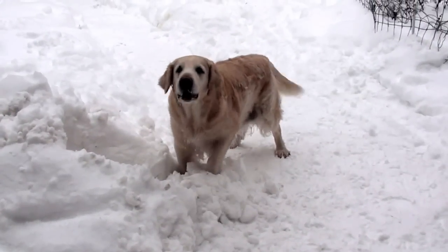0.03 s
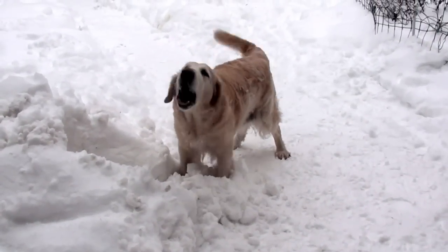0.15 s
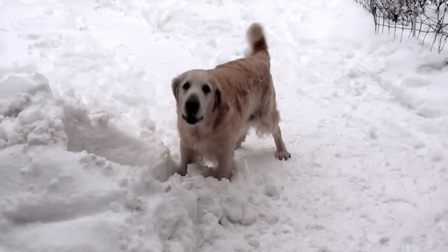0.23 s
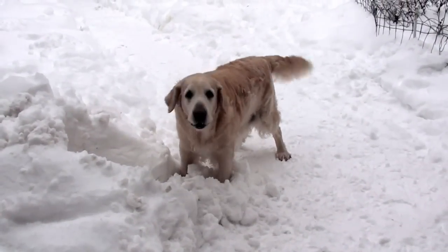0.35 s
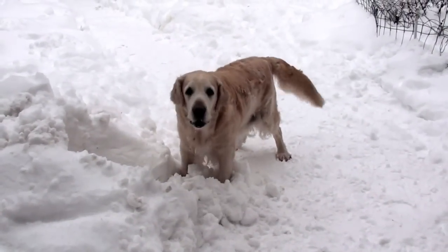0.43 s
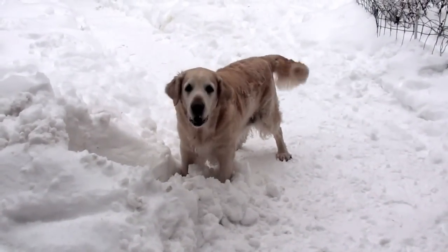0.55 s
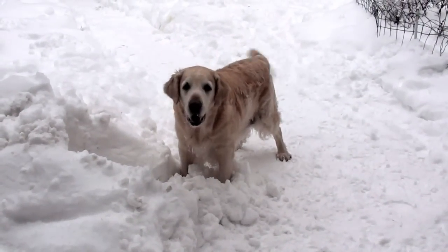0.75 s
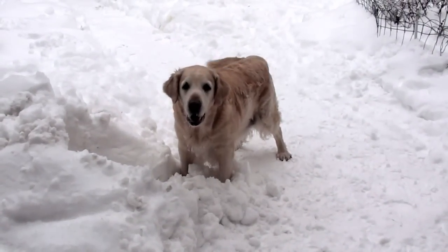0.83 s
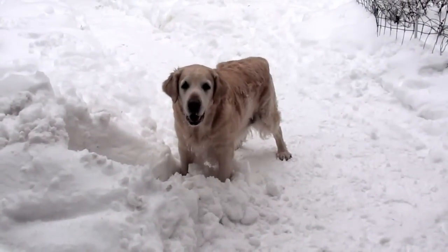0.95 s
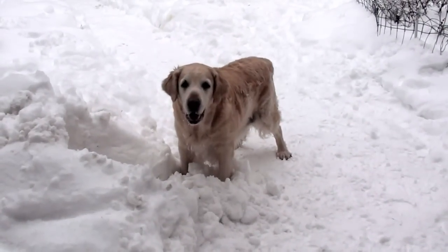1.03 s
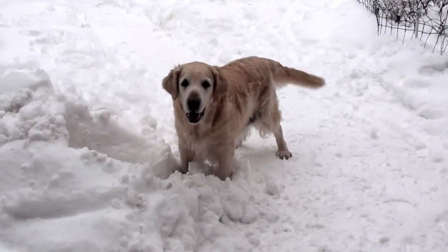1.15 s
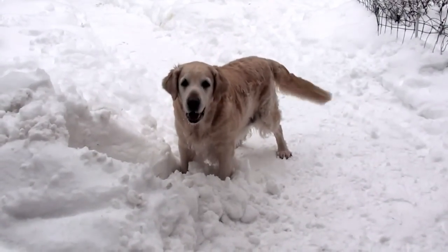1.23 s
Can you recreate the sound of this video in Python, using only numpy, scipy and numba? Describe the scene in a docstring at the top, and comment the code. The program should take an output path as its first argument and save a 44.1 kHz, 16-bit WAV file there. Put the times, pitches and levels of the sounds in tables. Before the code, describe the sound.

A large dog barks once, hoarse and abrupt, after a brief low grumble, a few metres from the microphone in a snowy yard. The bark echoes softly, leaving a steady distant rush and faint crunches of paws in snow.

```python
"""A steady distant rush in a snowy yard; then a large dog, a few metres from the microphone and a little
to the left, gives a short low grumble and one hoarse bark. Uneven vocal-fold pulses and rasping air ring
its throat as the jaw opens and shuts, and the yard answers softly. Paws press the snow faintly,
one thin bird trill follows the bark, and near the end the microphone takes a soft bump."""
import sys
import numpy as np
from scipy import signal
from scipy.fft import rfft, irfft
from scipy.io import wavfile
from scipy.ndimage import uniform_filter1d, minimum_filter1d, map_coordinates
from numba import njit

SR = 44100
rng = np.random.default_rng(int(sys.argv[2]) if len(sys.argv) > 2 else 0)


def master(y):
    """Save y as 16-bit WAV."""
    cut = np.clip(np.atleast_2d(y).T, -1, 1)
    pcm = np.round(cut * 32767)  # scale
    wavfile.write(sys.argv[1], SR, pcm.astype(np.int16))


N = 57330
TIME = np.arange(N) / SR


def undb(db):
    """Decibels to gain."""
    return 10 ** (np.asarray(db) / 20)


def unit(x):
    """Scale to rms 1."""
    return x / np.sqrt(np.mean(x ** 2))


def steady(x, seconds):
    """Hold the short-term level at 1."""
    return x / np.sqrt(uniform_filter1d(x ** 2, max(int(seconds * SR), 2)) + 1e-9)


def curve(rows, col=1):
    """One column of a table, joined by straight lines in time."""
    rows = np.array(rows)
    return np.interp(TIME, rows[:, 0], rows[:, col])


def swell(at_s, width_s):
    """A bell-shaped envelope."""
    return np.exp(-.5 * ((TIME - at_s) / width_s) ** 2)


def walk(rate_hz):
    """A random wander of rms 1."""
    return unit(map_coordinates(rng.standard_normal(N), [TIME * rate_hz], order=1))


def colour(x, points):
    """Filter by a spectrum of (Hz, dB) points; rms 1."""
    hz, db = np.array(points).T
    f = np.fft.rfftfreq(N, 1 / SR) + 1
    return unit(irfft(rfft(x) * undb(np.interp(np.log(f), np.log(hz), db)), N))


def noise(points):
    """Noise of rms 1 with a spectrum of (Hz, dB) points."""
    return colour(rng.standard_normal(N), points)


@njit
def bandpass(x, hz, width):
    """Band-pass with a moving centre, gain 1 there."""
    y, band, low = np.empty(len(x)), 0., 0.
    for i in range(len(x)):
        g, damping = np.tan(np.pi * hz[i] / SR), width / hz[i]
        v = (band + g * (x[i] - low)) / (1 + g * (g + damping))
        band, low = 2 * v - band, low + 2 * g * v
        y[i] = damping * v
    return y


def ring(x, hz, width_hz):
    """A steep resonance: the band-pass applied twice, rms 1."""
    hz, width = hz * np.ones(N), float(width_hz)
    return unit(bandpass(bandpass(x + 1e-18, hz, width), hz, width))


def spread(mid, side, left_db):
    """Mid and side to stereo, leaning left; the top treble stays in the centre."""
    side = side + np.tanh(left_db * np.log(10) / 40) * mid
    side = signal.sosfiltfilt(signal.butter(3, 6500, fs=SR, output="sos"), side)
    return np.array([mid + side, mid - side])


def distant_rush():
    """Broad noise from far beyond the yard, a little louder at the start."""
    # Each row: frequency in Hz, relative level in dB.
    spectrum = [(25, -38), (55, -15.5), (90, -14.5), (130, -14.5), (300, -9), (520, -7), (950, -3.5),
                (1500, -10), (2200, -14.5), (2800, -20), (4000, -24.5), (7000, -29), (10000, -34.5),
                (15500, -34)]
    # Each row: time in seconds, level in dB.
    levels = [(0, -41.5), (.12, -41), (.2, -40), (.45, -46), (.8, -46), (1.05, -45.5), (1.3, -45.5)]
    rush = spread(noise(spectrum), 0.26 * noise(spectrum), left_db=1.2)
    return rush * undb(curve(levels) + 0.7 * walk(15.23))


def bird(hz=7250, trill_hz=80):
    """One thin, faint whistle with a fast trill in its pitch."""
    pitch = hz * (1 + 0.014 * np.sin(2 * np.pi * trill_hz * TIME) + 0.0065 * walk(600))
    whistle = np.sin(2 * np.pi * np.cumsum(pitch) / SR)
    return whistle * undb(-63.5 + 3 * walk(150)) * swell(at_s=0.763, width_s=0.07)


def microphone():
    """A soft, low bump on the microphone, over its own hiss."""
    thud = steady(ring(rng.standard_normal(N), hz=52, width_hz=70), 0.036)
    bump = thud * undb(-50) * swell(at_s=1.212, width_s=.02)
    return bump + undb(-87) * rng.standard_normal(N)


def paws():
    """Paws press the snow in faint, grainy crunches."""
    # Each row: centre in seconds, width in seconds, level in dB.
    crunches = [(0.112, 0.024, -52.5), (0.562, 0.036, -52), (1.196, 0.0075, -56)]
    grains = unit(undb(3 * walk(500)))
    snow = grains * noise([(300, -7), (1200, -5), (3200, 2.5), (7000, -7.5), (14000, -19)])
    return snow * sum(undb(db) * swell(at, width) for at, width, db in crunches)


def yard_tail(build_s=0.022):
    """Diffuse response of the yard: each band dies at its own pace."""
    # Each row: frequency in Hz, gain in dB, seconds to fall by 60 dB.
    bands = [(154, -41, .35), (362, -45, 0.74), (564, -19.5, 1), (640, -11, 0.82), (690, -6.5, 0.86),
             (904, -5.5, 0.41), (1150, -16, 0.53), (1500, -8, 0.85), (1750, -9, 0.79), (2310, -5.5, .6),
             (3080, -6, .6), (4300, -5, 0.29), (7800, -37, 0.48), (14000, -28, 0.49)]
    hz, db, t60 = np.array(bands).T
    f = np.fft.rfftfreq(N, 1 / SR)
    spectrum, tail = rfft(rng.standard_normal(N)), 0
    for k, share in enumerate(np.eye(len(hz))):
        band = irfft(spectrum * np.interp(f, hz, share), N)
        decay = (1 - np.exp(-TIME / build_s)) * np.exp(-np.log(1000) * TIME / t60[k])
        tail = tail + band * undb(db[k]) * decay / np.linalg.norm(decay)
    return tail


def yard(dog):
    """The dog slightly to the left, with echoes from alternate sides and a diffuse tail."""
    # Each row: delay in seconds, level in dB against the direct sound.
    reflections = [(0.0137, -13.5), (.043, -9.5), (.075, -17.5), (.125, -19.5), (.205, -28.5), (.375, -35)]
    echoes = [undb(db) * np.interp(TIME - delay, TIME, dog, left=0) for delay, db in reflections]
    mid = dog + sum(echoes) + signal.fftconvolve(dog, yard_tail())[:N]
    side = sum((-1) ** k * echo for k, echo in enumerate(echoes))
    side += signal.fftconvolve(dog, yard_tail())[:N]
    return spread(mid, 0.27 * side, left_db=1.8)


def folds(hz, jitter, shimmer_db):
    """The vocal folds give one pulse per cycle, uneven in time and size; also their phase in turns."""
    turns = np.cumsum(hz * (1 + jitter * walk(np.mean(hz)))) / SR
    pulses = np.diff(np.floor(turns), prepend=0) * undb(shimmer_db * rng.standard_normal(N))
    return unit(pulses), turns


def grumble(hz=170.1):
    """The folds flutter slowly and unevenly, first behind a closed mouth and then under the bark."""
    # Each row: time in seconds, level in dB.
    levels = [(.035, -63), (.055, -43), (.13, -42.5), (.155, -41.5), (.18, -37.5), (.22, -39), (.36, -57),
              (.41, -44.5), (.46, -66), (.5, -100)]
    pulses, _ = folds(np.full(N, hz), jitter=.3, shimmer_db=5)
    hum = steady(ring(pulses, hz, width_hz=106), .05)
    return hum * undb(curve(levels) + 2 * walk(49))


def partial(hz, jitter=0.0291, flutter_db=4):
    """One partial that wavers in pitch and level."""
    turns = np.cumsum(hz * (1 + jitter * walk(250))) / SR
    return unit(np.sin(2 * np.pi * turns) * undb(flutter_db * walk(170)))


def fold_tones(pitch):
    """The fundamental and the side tones of unevenly vibrating folds."""
    # Each row: multiple of the pitch, relative level in dB.
    side_tones = [(.76, -23.5), (1.38, -21.5), (1.53, -18.5), (2.9, -27)]
    return undb(-3) * partial(pitch) + sum(undb(db) * partial(k * pitch) for k, db in side_tones)


def throat(source, jaw):
    """The throat's resonances shift in frequency and strength as the jaw opens; rms 1."""
    # Each row: centre in Hz with jaw shut, then open, width in Hz, relative dB with jaw shut, then open.
    resonances = [(353.4, 553.5, 123, 5, -1.5), (650, 709, 158, -2.5, -3), (932, 780, 30, -12, -23.5),
                  (1320, 1405, 310, -9.5, -10.5), (1830, 1979, 355, -15, -8), (2075, 2240, 270, -27, -6)]
    rung = 0
    for shut_hz, open_hz, width_hz, shut_db, open_db in resonances:
        hz = shut_hz + (open_hz - shut_hz) * jaw
        rung = rung + ring(source, hz, width_hz) * undb(shut_db + (open_db - shut_db) * jaw)
    return unit(rung)


def bark(attack_s=0.0016, release_s=0.025, rasp=0.75):
    """Rough pulses and rasp ring the throat, with a low puff of breath and air hissing past the teeth."""
    # Each row: time in seconds, pitch in Hz.
    melody = [(.208, 489.2), (.245, 460.5), (.27, 537), (.31, 520.4), (.345, 528), (.38, 485.4), (.43, 512)]
    # Each row: time in seconds, voice level in dB, jaw opening from 0 to 1, hiss level in dB.
    gesture = [(.209, -13, 0.12, -22.5), (.22, -13, 0, -31.5), (.24, -10, 0.17, -37.5),
               (.268, -11.5, 1, -33), (.315, -11, 0.99, -30.5), (.348, -13, 0.67, -39),
               (.378, -14.5, 0.34, -42), (.408, -17.5, 0.73, -38), (.424, -32, 0.97, -48)]
    # Each row: frequency in Hz, relative level of the hiss in dB.
    teeth_spectrum = [(1500, -8), (2700, -3), (3550, -7.5), (4050, 2), (4450, 2), (5100, -2.5), (6300, 1),
                      (6650, 0.5), (7150, 5.5), (8300, -6.5), (10500, -13), (12500, -24), (15500, -28)]
    onset = np.clip((TIME - gesture[0][0]) / attack_s + .5, 0, 1)
    gate = onset * np.exp(-np.maximum(TIME - gesture[-1][0], 0) / release_s)
    pitch, jaw = curve(melody), curve(gesture, 2)
    pulses, turns = folds(pitch, jitter=.07, shimmer_db=4)
    chop = unit((1 + .5 * np.cos(2 * np.pi * turns)) * undb(3.5 * walk(220)))  # the folds chop the air
    rough = undb(-3) * throat(pulses + rasp * chop * rng.standard_normal(N), jaw)
    voice_band = signal.butter(7, [280, 2315], "band", fs=SR, output="sos")
    voice = steady(signal.sosfilt(voice_band, rough + fold_tones(pitch)), 0.018)
    breath = noise([(20, -6), (50, 4), (80, -4), (124, 1), (500, -12), (2000, -50)])
    puff = undb(-29) * swell(at_s=0.27, width_s=0.062) * breath  # peaks as the jaw opens
    lead_air = undb(-39.5) * swell(at_s=0.203, width_s=0.0023)  # escapes just before the voice
    airflow = gate * undb(curve(gesture, 3)) + lead_air
    hiss = airflow * colour(chop * rng.standard_normal(N), teeth_spectrum)
    return gate * (voice + puff) * undb(curve(gesture)) + hiss


def scene():
    """The dog in its yard, over the background."""
    return yard(bark() + grumble()) + distant_rush() + paws() + bird() + microphone()


def record(dry):
    """A fast limiter holds peaks to full scale; the top treble is cut."""
    limiter_s, top_hz = 0.0026, 15750
    size = int(limiter_s * SR)
    gain = np.minimum(1, 1 / (np.abs(dry).max(axis=0) + 1e-9))
    gain = uniform_filter1d(minimum_filter1d(gain, size), size)
    return signal.sosfilt(signal.ellip(10, .1, 90, top_hz, fs=SR, output="sos"), dry * gain)


dry = scene()
out = record(dry)
master(out)
```